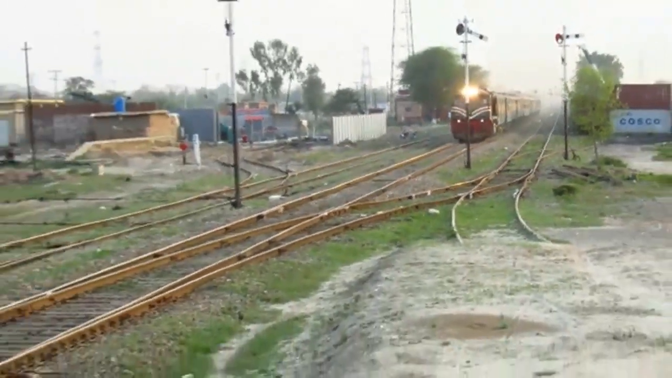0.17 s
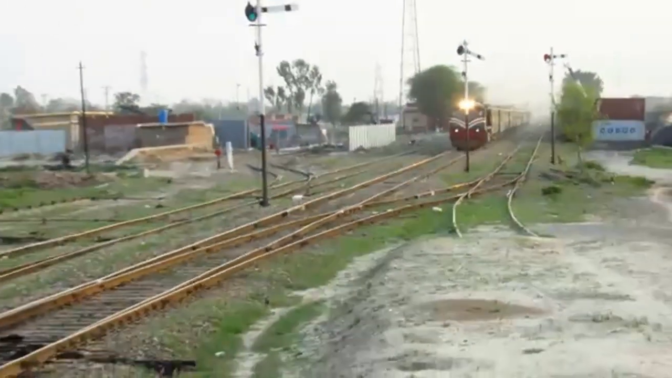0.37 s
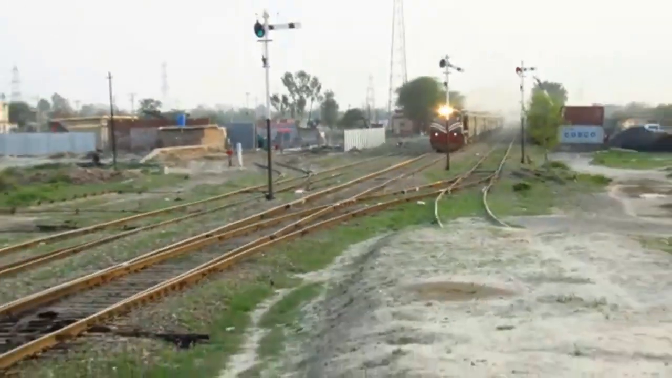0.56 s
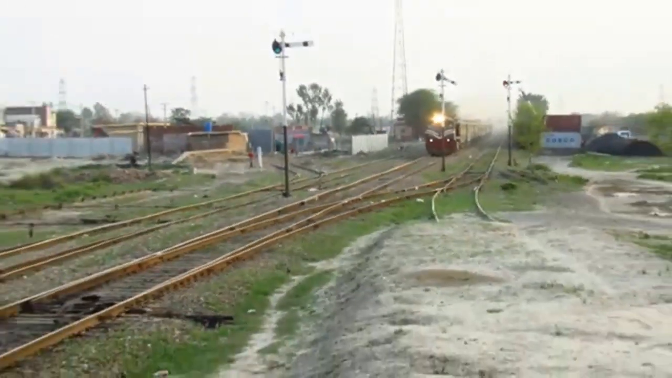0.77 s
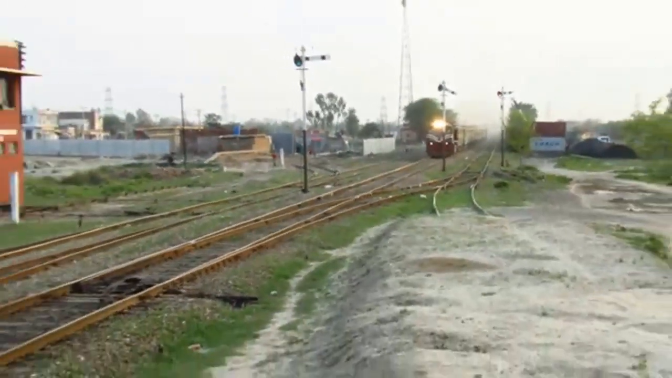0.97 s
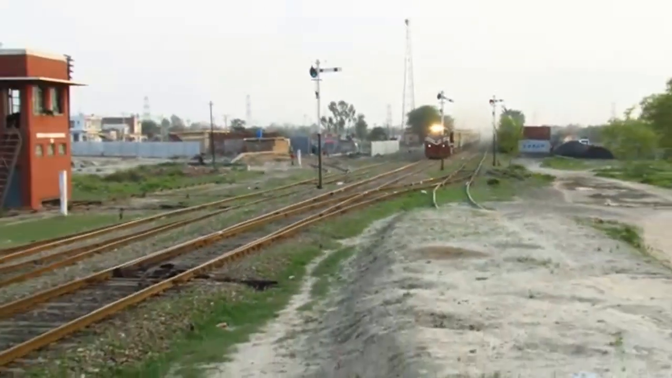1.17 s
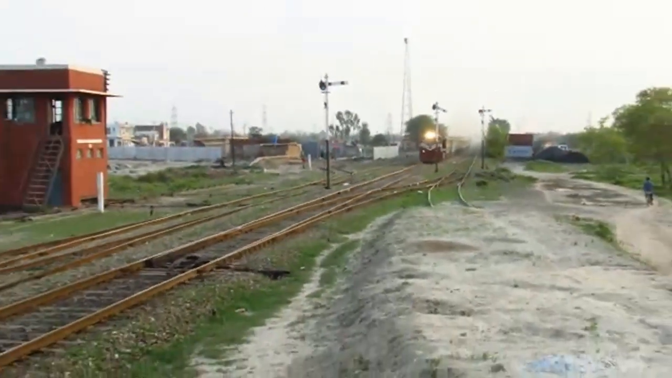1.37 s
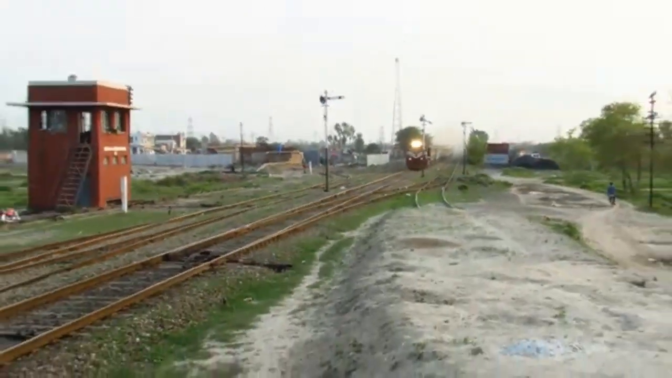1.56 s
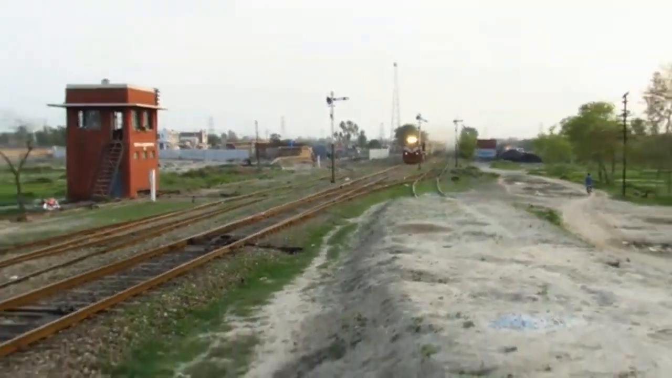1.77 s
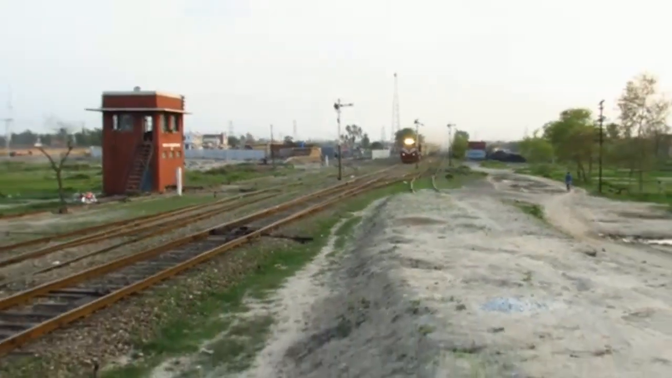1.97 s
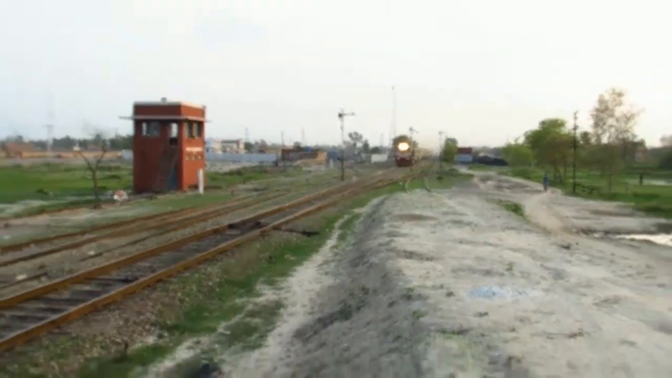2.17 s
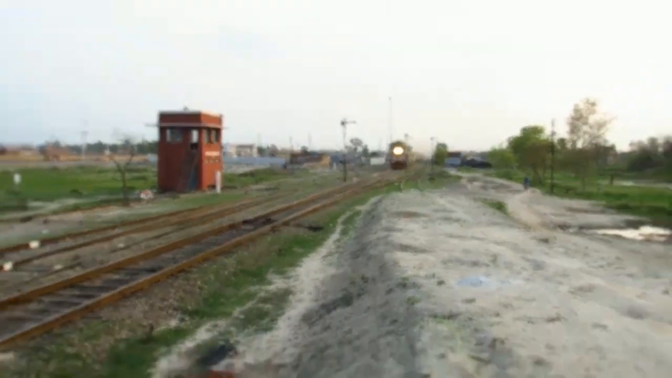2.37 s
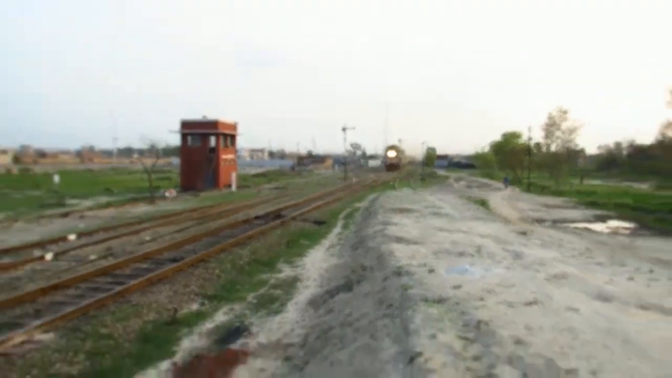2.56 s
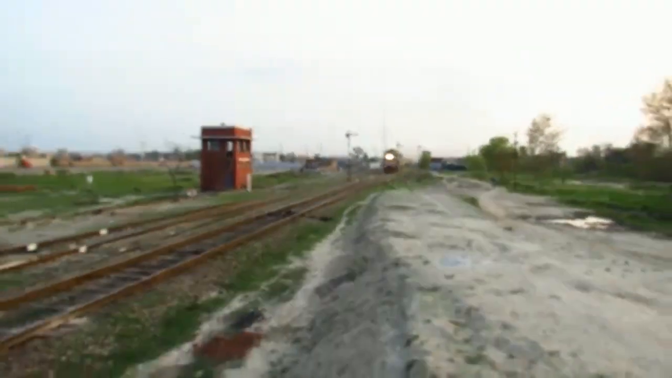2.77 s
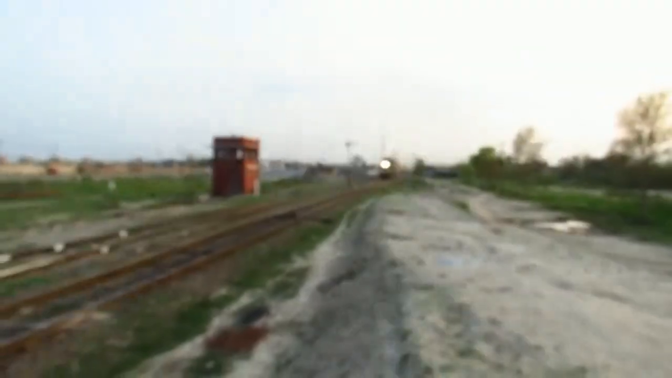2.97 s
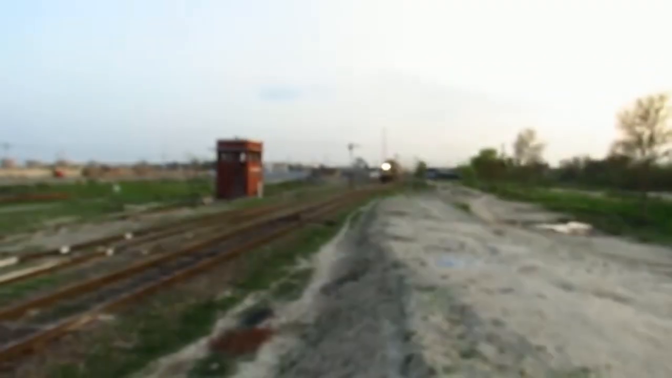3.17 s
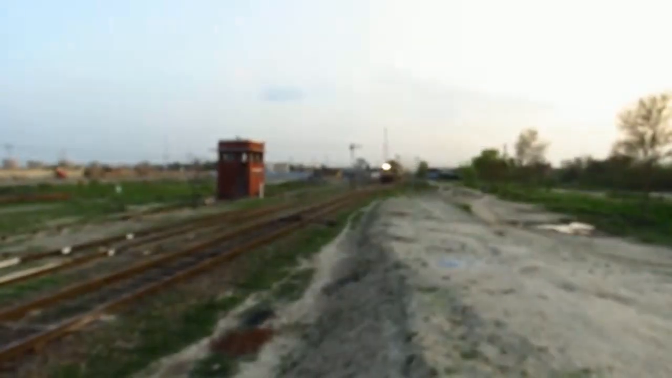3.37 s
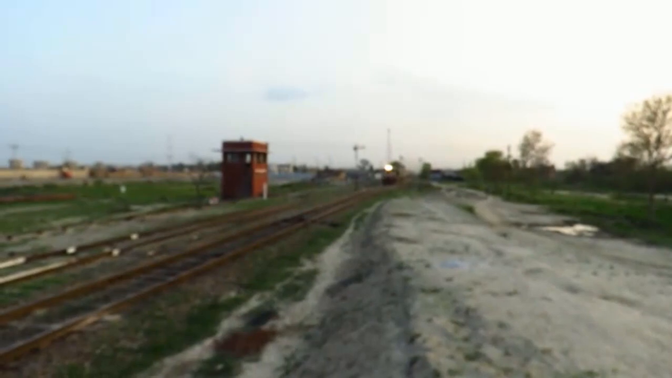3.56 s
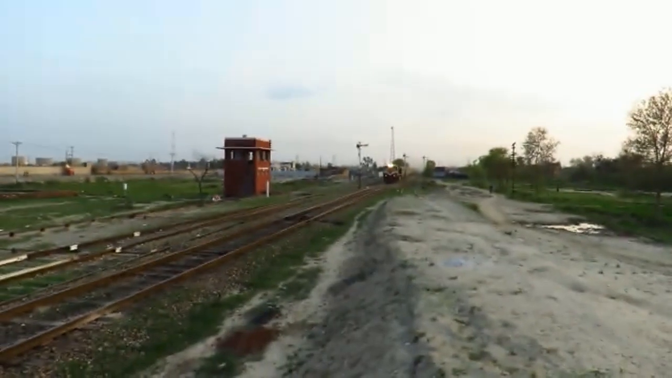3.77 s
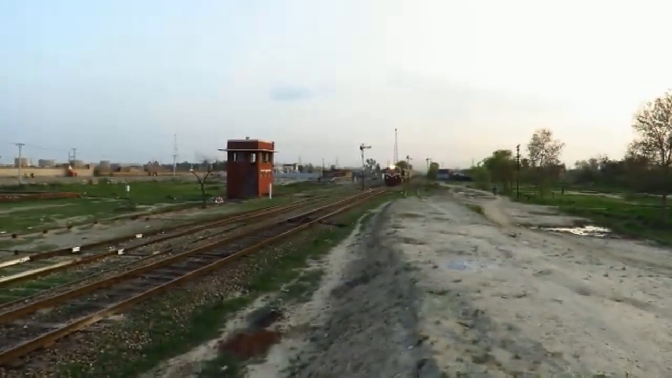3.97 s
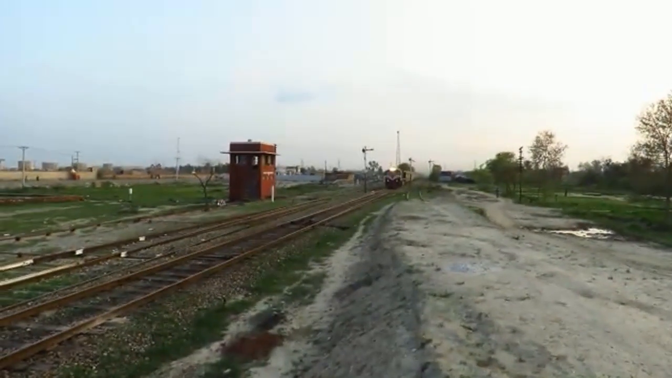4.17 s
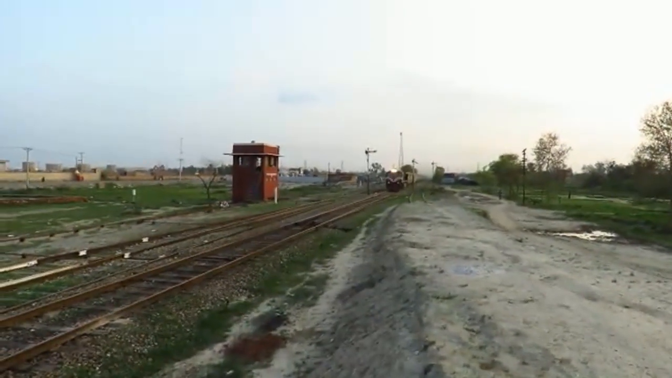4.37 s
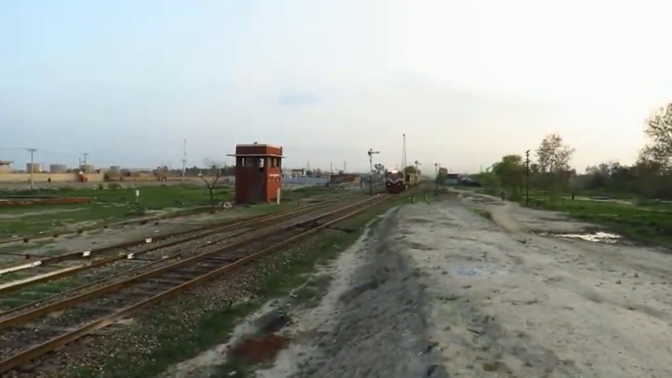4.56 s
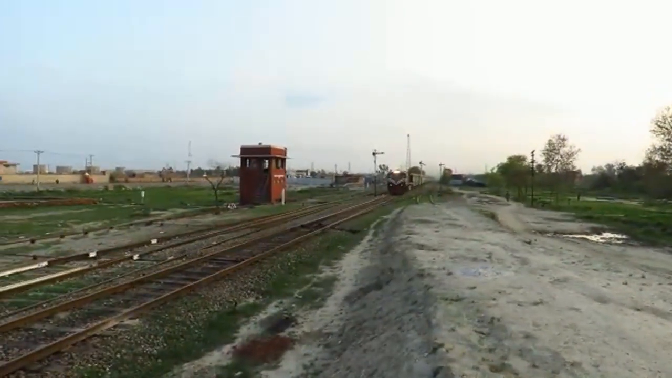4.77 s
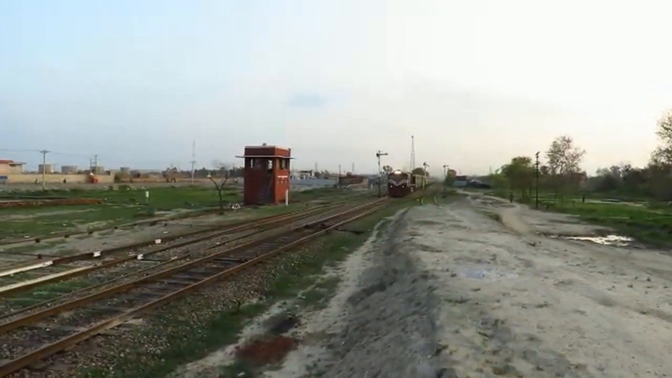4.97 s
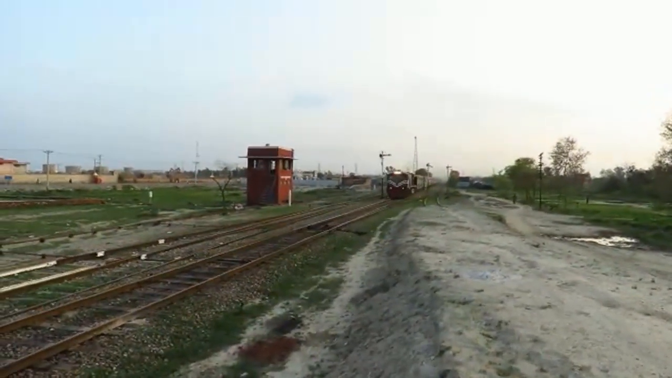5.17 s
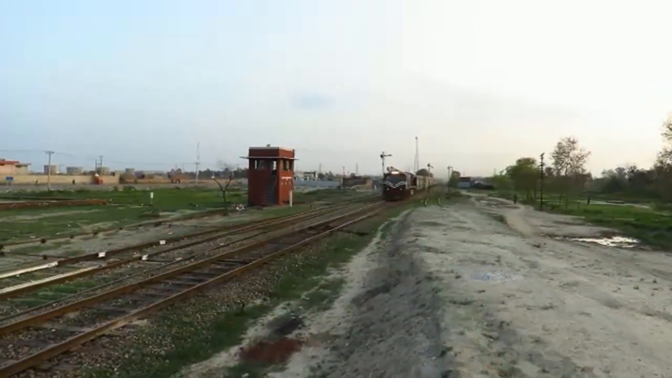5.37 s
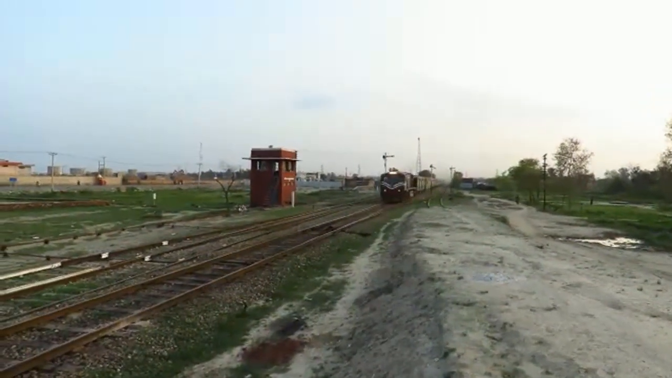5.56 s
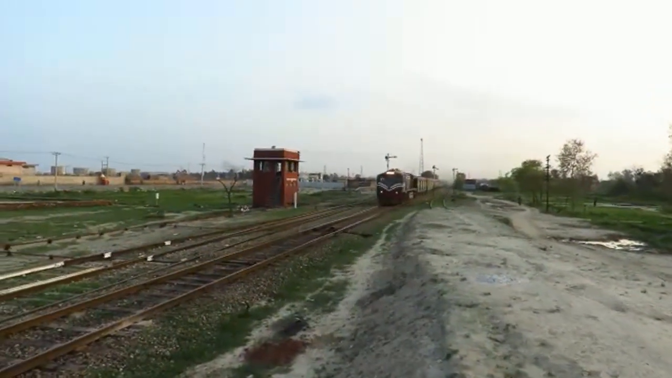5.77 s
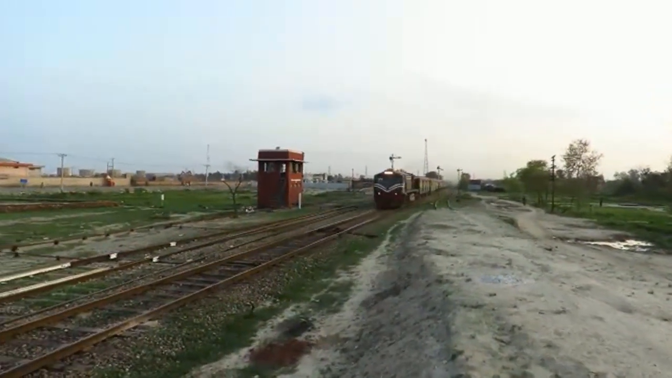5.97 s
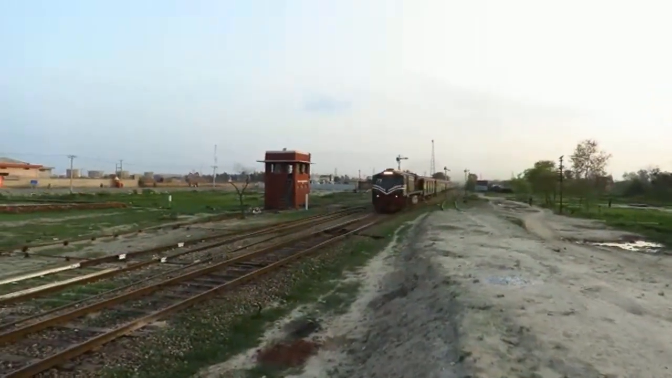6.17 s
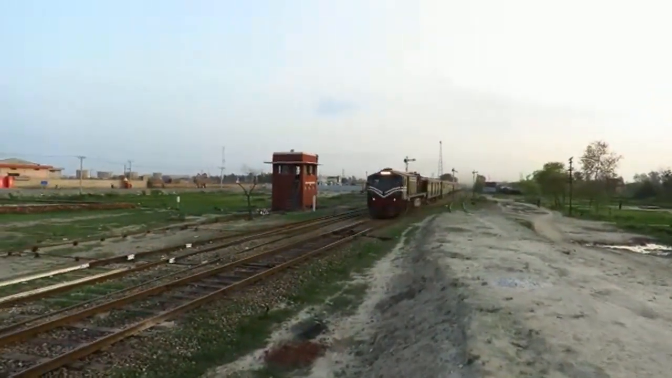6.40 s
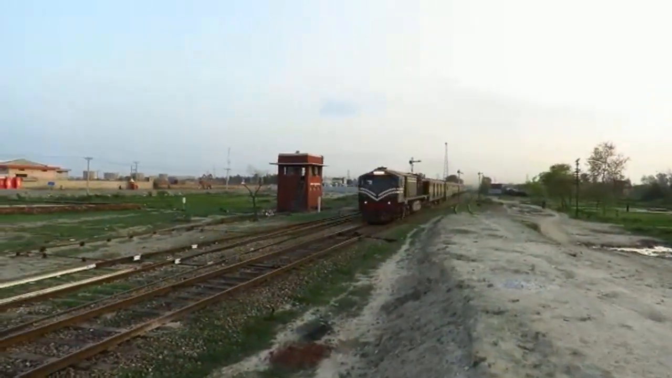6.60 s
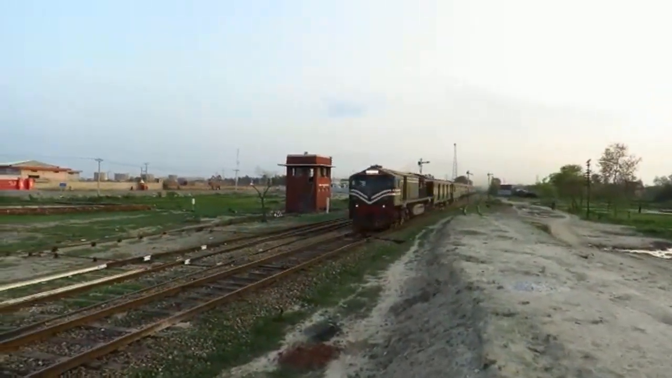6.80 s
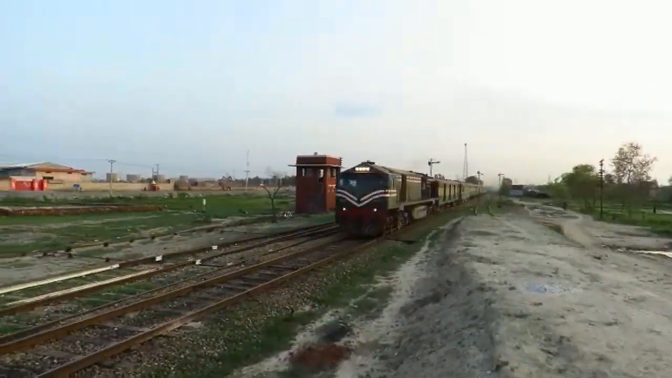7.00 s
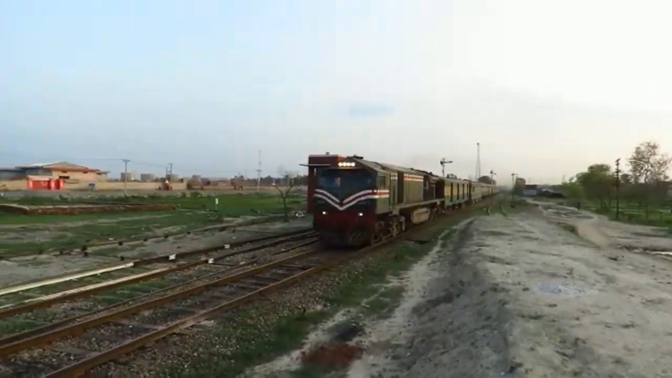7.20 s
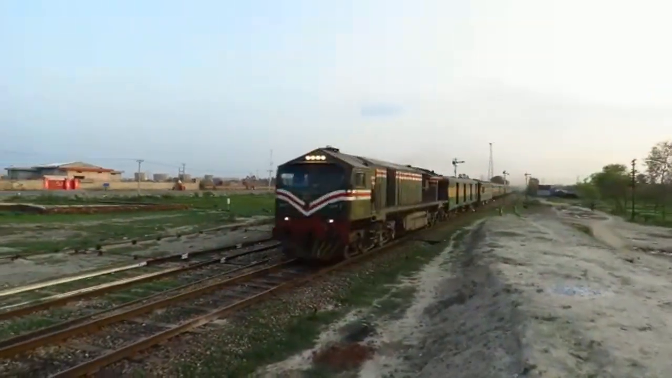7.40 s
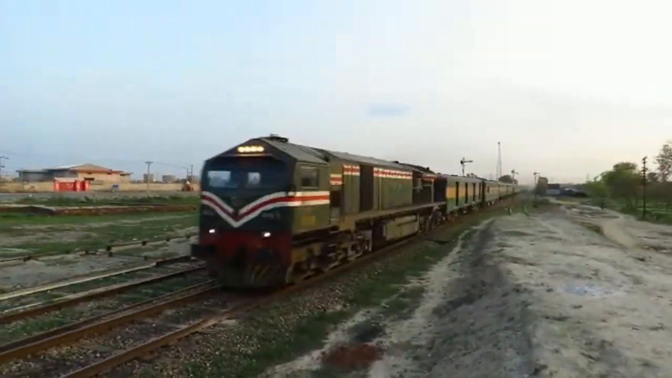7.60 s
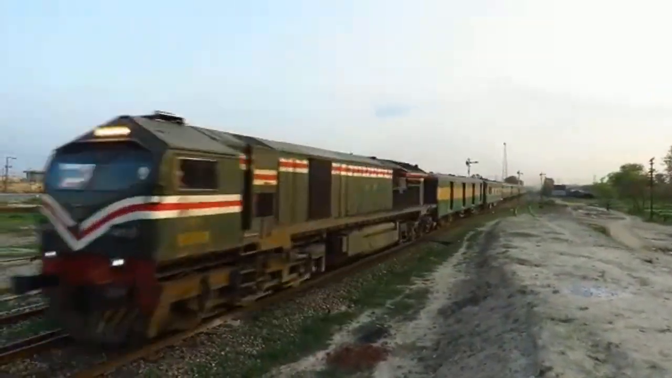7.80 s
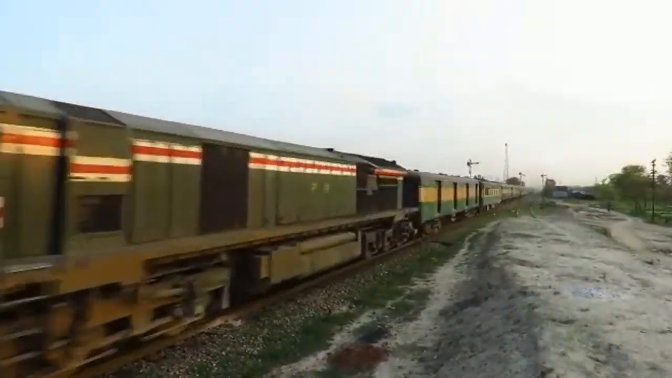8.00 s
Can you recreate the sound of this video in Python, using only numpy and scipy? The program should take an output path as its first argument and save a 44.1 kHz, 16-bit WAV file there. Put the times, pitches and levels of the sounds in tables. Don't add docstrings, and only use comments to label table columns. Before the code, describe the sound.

Outdoors beside a railway, a far diesel locomotive throbs unevenly under a broad roar while breeze flutters low on the microphone. A short horn blast at one second echoes back lower; a distant bird chirps and the camera body ticks. Faint wheel knocks begin after four seconds, a louder second blast follows, then rumble and banging swell until the engine is almost abreast.

```python
import sys
import numpy as np
from scipy import signal
from scipy.fft import rfft, irfft
from scipy.io import wavfile
from scipy.ndimage import uniform_filter1d

SR = 44100
rng = np.random.default_rng(int(sys.argv[2]) if len(sys.argv) > 2 else 0)


def magnitude_from_level(level_db):
    exponent = np.asarray(level_db, float) / 20
    return 10 ** exponent


def master_out(mix):
    frames = np.transpose(np.atleast_2d(mix))
    ceiling = np.clip(frames, -1, 1)
    pcm = np.round(ceiling * 32767).astype(np.int16)
    wavfile.write(sys.argv[1], SR, pcm)


N = 354563
T = np.arange(N) / SR
HZ = np.maximum(np.fft.rfftfreq(N, 1 / SR), 1)
LEFT_RIGHT = np.array([[1], [-1]])

SPEED_M_S, ABREAST_S, TRACK_M, START_M = 22.93, 8.665, 4.7, 190
# level in dB at the start, dB gained per halving of distance,
# and dB lost to air and ground per 100 m.
EXHAUST_LAW, ROAR_LAW, RUMBLE_LAW = (-57, 3.36, 2.25), (-70, 5.28, 3.08), (-66, 4.43, 6.54)
HISS_LAW, LOW_WHINE_LAW, HIGH_WHINE_LAW = (-108, 2.45, 20.4), (-94, 5.8, 0.1), (-88.5, 12.24, 0.1)

CYCLE_HZ, FIRST_FIRING_S, FIRING_SCATTER_DB = 8.771, .0048, 1.6
PUFF_DB = [-15, -8, -16, -24, -14, -24, -22, -2, -15, -24, -3, 0, -20, -24, -18, -24]
# pitch in Hz, width in Hz, level in dB.
SILENCER = [(46, 4.2, -20.5), (69, 3.7, -2), (100, 14, 6.5), (111.9, 4.9, 4.5), (116, 6.1, -24.5),
            (218, 150, -29)]
# frequency in Hz, level in dB per Hz.
ROAR_COLOUR = [(260, -27), (450, -13), (644, -4), (824, -5.5), (1110, -8.5), (1450, -9.5), (1600, -5),
               (1770, -9.5), (1910, -9), (3950, -19), (5180, -32), (8600, -47.5), (11200, -79),
               (18900, -120)]
TOWN_DB = -65.5
# frequency in Hz, level in dB per Hz.
RUMBLE_COLOUR = [(15, -37), (25, -26), (43, -18.5), (77, -9.5), (108, -2), (130, -5), (179, -4.5),
                 (295, -11), (406, -24.5), (508, -17.5), (609, -22.5), (700, -16.5), (910, -45),
                 (1540, -120)]
# frequency in Hz, level in dB per Hz.
HISS_COLOUR = [(2350, -29.5), (4000, -6.5), (5030, -4), (5420, -8), (7040, -12.5), (11100, -18.5),
               (12000, -25), (15600, -52.5), (22000, -120)]
# pitch in Hz, width in Hz, level in dB.
WHINE_MODES = [
    [(815, 40, 0)],
    [(1625, 160, 0), (4030, 70, -11)],
]
BEAM_S, BEAM_WIDTH_S, BEAM_DB = 3.4, 1.3, -73
# frequency in Hz, level in dB.
UNSHARED = [(60, -23.5), (200, -18.5), (670, -14.5), (2250, -10), (7500, -5.5), (13800, -10)]
PORT_LAG_S = 4e-5

# frequency in Hz, level in dB per Hz.
BUFFET_COLOUR = [(35, -44.5), (60, -14), (130, -2), (198, 0.5), (281, -5.5), (385, -11.5), (433, -18.5),
                 (750, -27), (980, -62), (1650, -120)]
# time in seconds, level in dB.
WIND_STRENGTH = [(0, -56), (1.2, -54), (2.8, -52.5), (3.5, -56.5), (4.4, -49.5), (6.2, -50.5), (7, -53.5),
                 (8.04, -54)]
GUSTINESS_DB = -1

HORN_HZ = 723
DIRECT_FLUTTER_DB, ECHO_FLUTTER_DB, RASP = (.27, .4), .68, .13
ATTACK_S, SETTLE_S, LAST_GASP_S = .012, .07, .016
SCATTER_DB, SCATTER_T60_S = -7, .6
# valve opens, starts closing and is shut, all in seconds,
# fullest level in dB.
HORN_BLASTS = [
    (0.937, 1.205, 1.291, -38),
    (5.481, 5.79, 5.856, -25),
]
# pitch in Hz, level against the fullest in dB.
DIAPHRAGM = [
    (715, -16),
    (732.5, -3.5),
    (722.7, -2.5),
    (719.2, -0.4),
    (729.4, -2),
    (739, -4.5),
    (756, -11),
]
# time in seconds, level in dB.
VALVE_SPITS = [
    (.925, -58),
    (5.469, -52),
]
# multiple of the pitch, level in dB.
DIRECT_OVERTONES = [
    [(1, 0), (2, -12), (3, -7), (4, -15), (5, -23), (6, -24), (7, -32), (8, -40), (9, -39), (10, -49),
     (11, -54), (12, -53), (13, -53), (14, -60), (15, -61), (16, -65)],
    [(1, 0), (2, -23), (3, -15), (4, -31), (5, -31), (6, -30), (7, -36), (8, -41), (9, -43), (10, -45),
     (11, -43), (12, -44), (13, -49), (14, -52), (15, -54), (16, -51), (17, -55), (18, -63), (19, -64),
     (20, -65)],
]
# multiple of the pitch, level in dB.
WALL_OVERTONES = [(1, -1), (2, -8), (3, -13), (4, -8.5), (5, -16), (6, -24), (7, -28), (8, -34), (9, -41),
                  (10, -39.5), (11, -43.5), (12, -50)]
# multiple of the pitch, level in dB.
REAR_OVERTONES = [(1, 0), (2, -5), (3, -14)]
# start in seconds, pitch in Hz, level in dB,
# dulling in dB per overtone, left minus right in dB.
WALL_ECHOES = [
    [(1.24, 706, -12.5, -.5, -2.5), (1.205, 711, -15.5, -0.84, 10.5), (1.51, 685, -12.5, -6, 0),
     (1.3, 930, -30, -4, 3)],
    [(5.49, 711, -15.5, -10, 4), (5.50, 648.5, -23.5, -8.5, -1.5), (5.80, 710, -31.5, 0.37, -1.5),
     (5.86, 678, -23.5, -8.5, 1.5), (5.78, 680, -22.5, -21, -0.5), (6.2, 675, -30, -3, -3)],
]
REAR_WALL_ECHOES = [
    [(1.09, 938, -22.5, -0.5, 4.5), (1.24, 923, -24.5, -5.5, -5)],
    [(5.51, 934, -32.5, 4, 5.5), (5.70, 928, -30, -5, -5), (5.80, 896, -35, -14, 1),
     (5.93, 901.4, -32.5, -8, 5.5)],
]
LONG_ECHOES = [
    [(.03, 829, -43, 0, 19), (.1, 1314, -38.5, 0, -5), (.22, 1020, -39, 0, 10.5), (.4, 1284, -38, 0, 7),
     (.42, 822, -40, 0, 10), (.55, 1000, -38, 0, 12), (.58, 1680, -46, 0, 0), (1.17, 1710, -30, 0, 3),
     (1.37, 1715, -32, 0, -3), (1.65, 1700, -34, 0, 2)],
    [(5.83, 1690, -39, 0, 2), (6.2, 1665, -42, 0, -2)],
]

# loudest moment in seconds,
# half length in seconds, pitch in Hz, sag in Hz per second, level in dB.
DRIFTING_TONES = [
    (2.598, 2.4, 812, 7.5, -71.5),
    (3.2, 0.97, 3910, 12, -85.5),
    (5.15, 0.44, 4030, 0.11, -79),
    (7.024, .16, 1642, 0.107, -60.5),
    (7.9, 0.22, 1635, 60, -49.5),
]
# start in seconds, length in seconds, pitch in Hz, level in dB.
BIRD_NOTES = [
    (1.628, 0.064, 3230, -61),
    (1.655, .1, 3540, -63),
    (1.745, .04, 3280, -66),
    (1.8, 0.075, 3260, -60),
    (1.863, 0.049, 3213, -59),
]
# time in seconds, level in dB, brightness in dB.
BODY_TICKS = [
    (3.2212, -37.5, -28),
    (3.3294, -53, -23),
    (3.78, -36.5, -20.5),
    (3.7864, -50, -24),
]
# time in seconds, level in dB, ring time in seconds,
# brightness in dB per octave.
WHEEL_BLOWS = [(4.1294, -56, 0.26, 0.5), (4.2094, -57, 0.29, 2.5), (4.429, -46.5, 0.24, 0.2),
               (4.66, -52.5, 0.71, 1), (4.8694, -47.5, 0.41, 0.9), (4.9494, -47, 0.27, -0.5),
               (5.08, -54, .5, 1.5), (5.2225, -45.5, 0.24, 0), (5.2914, -56, 0.29, -1.5),
               (6.366, -36, 0.41, 0.5), (6.4596, -45, 0.46, 0), (6.6393, -51, 0.45, 1.5),
               (6.856, -38.5, 0.37, 0), (6.9494, -46, 0.16, -1.5), (7.2256, -30.5, 0.49, 0.6),
               (7.258, -44, 0.7, -1), (7.337, -38.5, 0.24, -0.5), (7.42, -36, 0.62, -1.8),
               (7.5494, -44, 0.76, 6), (7.668, -34.5, 0.44, -1), (7.741, -34.5, 0.67, -0.2),
               (7.7968, -22, 0.51, 0.36), (7.885, -25, 0.58, 0), (7.9863, -23.5, 0.28, -0.3)]
# frequency in Hz, level in dB per Hz.
BANG_COLOUR = [(88, -30), (150, -15.5), (217, -0.5), (309, 1), (465, -9), (559, -4), (767, -5.5),
               (1260, -10), (1610, -14.5), (1770, -12.5), (2860, -21.5), (3260, -20), (6000, -34),
               (12600, -44.5), (16400, -79), (22000, -120)]
# pitch in Hz, width in Hz, level in dB.
RAIL_RINGS = [(713, 94, -9), (1620, 66, -4), (2104, 92, 1.5), (2730, 28, -13), (3170, 44, -19),
              (3800, 43, -17)]


def unit(x):
    return x / np.sqrt(np.mean(x ** 2))


def shape_db(table):
    hz, db = np.transpose(table)
    return np.interp(np.log(HZ), np.log(hz), db, left=-90, right=-90)


def walk(rate):
    hold = int(SR / rate)
    steps = np.repeat(rng.standard_normal(N // hold + 1), hold)
    return unit(uniform_filter1d(uniform_filter1d(steps, hold), hold)[:N])


def ring(x, modes):
    return sum(magnitude_from_level(db) * signal.lfilter(*signal.iirpeak(hz, hz / width, fs=SR), x) for hz, width, db in modes)


def decay(s, t60, rise):
    age = np.maximum(T - s, 0)
    return (1 - np.exp(-age / rise)) * np.exp(-np.log(1000) * age / max(t60, .003))


def wide_noise():
    mid, side = rfft(rng.standard_normal((2, N)))
    return mid + magnitude_from_level(shape_db(UNSHARED)) * side * LEFT_RIGHT


def tilted(table, slope_db, flicker_db):
    noise = wide_noise() * magnitude_from_level(shape_db(table))
    scale = np.sqrt(np.mean(irfft(noise, N) ** 2))
    out = 0
    for octave in range(-6, 5):
        share = np.clip(1 - np.abs(np.log2(HZ / 1000) - octave), 0, 1)
        out = out + irfft(noise * share, N) * magnitude_from_level(octave * slope_db + flicker_db * walk(14))
    return out / scale


def approach(db, per_halving_db, loss_db):
    metres = np.hypot(SPEED_M_S * (ABREAST_S - T), TRACK_M)
    return magnitude_from_level(db + per_halving_db * np.log2(START_M / metres) + loss_db * (START_M - metres) / 100)


def exhaust():
    cylinders = len(PUFF_DB)
    count = int(N / SR * CYCLE_HZ * cylinders) - 1
    at = FIRST_FIRING_S + np.arange(count) / CYCLE_HZ / cylinders
    puffs = np.zeros(N)
    puff_db = np.resize(PUFF_DB, count) + FIRING_SCATTER_DB * rng.standard_normal(count)
    puffs[(at * SR).astype(int)] = -magnitude_from_level(puff_db)
    band = signal.butter(2, [42, 240], "band", fs=SR, output="sos")
    return approach(*EXHAUST_LAW) * unit(signal.sosfilt(band, ring(puffs, SILENCER)))


def roar():
    return np.hypot(approach(*ROAR_LAW), magnitude_from_level(TOWN_DB)) * tilted(ROAR_COLOUR, 0, 1.6)


def hiss():
    return approach(*HISS_LAW) * magnitude_from_level(1.5 * walk(25)) * tilted(HISS_COLOUR, 0, 0.79)


def rumble():
    return approach(*RUMBLE_LAW) * tilted(RUMBLE_COLOUR, 0, 1.7)


def whine():
    beam = magnitude_from_level(BEAM_DB) * np.exp(-((T - BEAM_S) / BEAM_WIDTH_S) ** 2)
    sizes = approach(*LOW_WHINE_LAW), approach(*HIGH_WHINE_LAW) + beam
    out = 0
    for size, modes in zip(sizes, WHINE_MODES):
        narrow = unit(ring(ring(irfft(wide_noise(), N), modes), modes))
        out = out + size * magnitude_from_level(0.6 * walk(8.4)) * narrow
    return out


def breeze():
    colour = magnitude_from_level(shape_db(BUFFET_COLOUR))
    push, stray = (unit(irfft(rfft(rng.standard_normal(N)) * colour, N)) for _ in range(2))
    gust_db = np.interp(T, *np.transpose(WIND_STRENGTH)) + GUSTINESS_DB * walk(6) + 2.8 * walk(40)
    return magnitude_from_level(gust_db) * (push * LEFT_RIGHT + magnitude_from_level(-9.5) * stray)


def blow(opens, closing, shut, db):
    turning = (closing + shut) / 2
    times = [opens, opens + ATTACK_S, opens + SETTLE_S, closing, turning, shut - LAST_GASP_S, shut]
    return np.array([(s, hz, db + below_db) for s, (hz, below_db) in zip(times, DIAPHRAGM)])


def horn(blast, overtones, start, ratio, dull_db, flutter_db):
    s, hz, db = np.transpose(blast)
    s = s - s[0] + start
    t = T[int((s[0] - .012) * SR):int((s[-1] + .025) * SR)]
    valve = np.clip((t - t[0]) / 0.014, 0, 1) ** 2 * np.clip((t[-1] - t) / 0.018, 0, 1) ** 2
    phase = 2 * np.pi * np.cumsum(ratio * np.interp(t, s, hz)) / SR
    level_db = np.interp(t, s, db)
    weak_db = np.minimum(level_db - db.max() + 2.5, 0) * (t > s.mean())
    air, rasp = walk(110), walk(700)
    stack = 0
    for k, over_db in overtones:
        own = rng.integers(N - len(t))
        reach = np.minimum(k, 5 / flutter_db ** .5) ** .7
        waver_db = (air[:len(t)] + air[own:own + len(t)]) * flutter_db * reach
        rough = 1 + RASP * min(flutter_db, .5) * min(k, 8) * rasp[own:own + len(t)]
        size = magnitude_from_level(over_db + (dull_db + 0.19 * weak_db) * (k - 1) + waver_db) * rough
        stack = stack + size * np.sin(k * phase + 2 * np.pi * rng.random())
    out = np.zeros(N)
    out[int(t[0] * SR + .5):][:len(t)] = np.sqrt(2) * valve * stack * magnitude_from_level(level_db)
    return out


def horns():
    air = unit(ring(ring(rng.standard_normal(N), [(1600, 1400, 1)]), [(1700, 2500, 0)]))
    direct = air * sum(magnitude_from_level(db) * decay(s, 0.43, 0.0089) for s, db in VALVE_SPITS)
    back = 0
    colours = WALL_OVERTONES, REAR_OVERTONES, REAR_OVERTONES[:1]
    for row, overtones, flutter_db, *echoes in zip(HORN_BLASTS, DIRECT_OVERTONES, DIRECT_FLUTTER_DB,
                                                   WALL_ECHOES, REAR_WALL_ECHOES, LONG_ECHOES):
        blast = blow(*row)
        direct = direct + magnitude_from_level(-.4 * LEFT_RIGHT) * horn(blast, overtones, blast[0][0], 1, 0, flutter_db)
        for colour, returns in zip(colours, echoes):
            for s, hz, db, dull_db, pan_db in returns:
                echo = horn(blast, colour, s, hz / HORN_HZ, dull_db, ECHO_FLUTTER_DB)
                back = back + magnitude_from_level(db + pan_db * LEFT_RIGHT / 2) * echo
    smear = rng.standard_normal((2, SR // 2)) * magnitude_from_level(-60 * T[:SR // 2] / SCATTER_T60_S)
    smear = smear / np.sqrt(np.sum(smear ** 2) / 2)
    scattered = signal.fftconvolve(back, smear, axes=1)[:, :N]
    return direct + magnitude_from_level(-0.23) * back + magnitude_from_level(SCATTER_DB) * scattered


def tones():
    out = 0
    for s, half, hz, sag_hz, db in DRIFTING_TONES:
        pitch = (hz - sag_hz * (T - s)) * (1 + .004 * walk(25))
        swell = magnitude_from_level(db + 2.85 * walk(30)) * np.exp(-((T - s) / half) ** 4)
        out = out + swell * np.sqrt(2) * np.sin(2 * np.pi * np.cumsum(pitch) / SR)
    return out


def bird():
    husk = .5 + walk(400)
    notes = 0
    for s, length, hz, db in BIRD_NOTES:
        swell = np.sin(np.pi * np.clip((T - s) / length, 0, 1))
        notes = notes + magnitude_from_level(db) * np.sin(2 * np.pi * hz * T) * swell
    return .5 * husk * notes * magnitude_from_level(3.0 * LEFT_RIGHT)


def ticks():
    noise = rng.standard_normal(N)
    knock = unit(ring(ring(noise, [(1340, 1300, 0)]), [(1480, 2200, 0)]))
    crack = unit(ring(noise, [(5750, 2600, 0), (10360, 2200, -.5)]))
    return sum(magnitude_from_level(db - 7) * decay(s, 0.022, 0.00039) * (knock + magnitude_from_level(bright_db) * crack)
               for s, db, bright_db in BODY_TICKS)


def joints():
    bursts = [magnitude_from_level(db) * decay(s, t60, 0.0049) for s, db, t60, _ in WHEEL_BLOWS]
    level = sum(bursts) + 1e-9
    slope_db = sum(burst * row[3] for burst, row in zip(bursts, WHEEL_BLOWS)) / level
    rattle = tilted(BANG_COLOUR, slope_db, 0.29)
    return level * magnitude_from_level(-6) * (rattle + magnitude_from_level(-15.5) * unit(ring(rattle, RAIL_RINGS)))


def scene():
    train = exhaust() + roar() + hiss() + rumble() + whine() + tones() + joints()
    lead = PORT_LAG_S * SR / 2 * (1 - T / ABREAST_S) ** 2 * LEFT_RIGHT
    train = train + lead * np.gradient(train, axis=1)
    return train + breeze() + horns() + bird() + ticks()


def band_limit(x):
    return signal.sosfilt(signal.butter(12, 14400, fs=SR, output="sos"), x)


def record(dry):
    soft = signal.sosfilt(signal.butter(2, 15000, fs=SR, output="sos"), dry)
    mix = signal.sosfilt(signal.ellip(8, .2, 70, 14400, fs=SR, output="sos"), soft)
    return band_limit(mix)


dry = scene()
out = record(dry)
master_out(out)
```